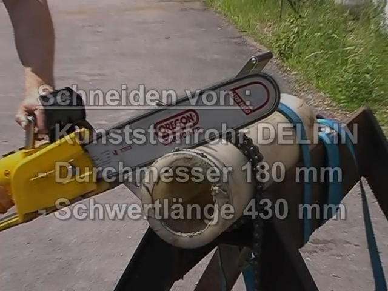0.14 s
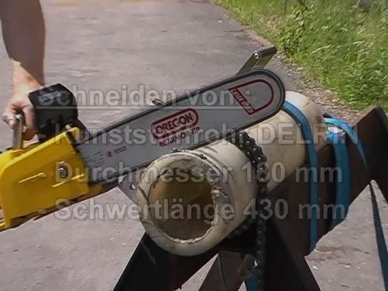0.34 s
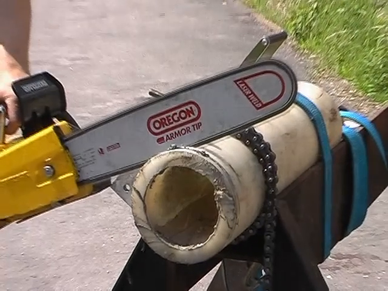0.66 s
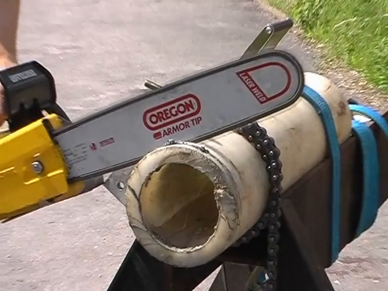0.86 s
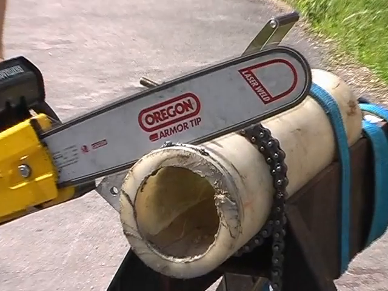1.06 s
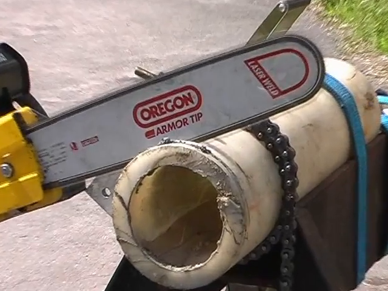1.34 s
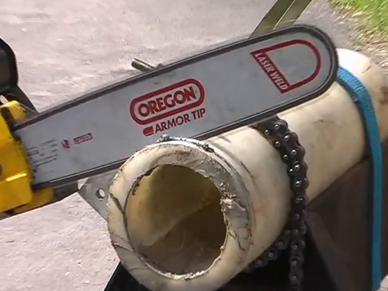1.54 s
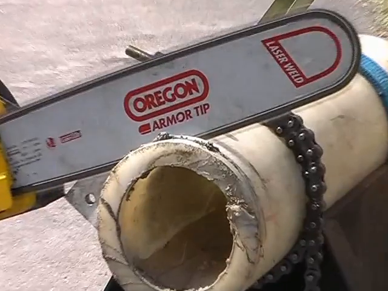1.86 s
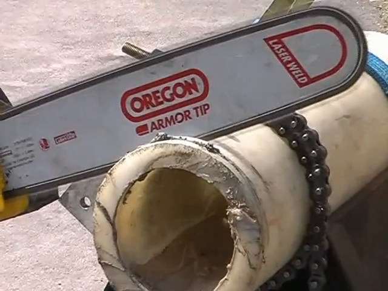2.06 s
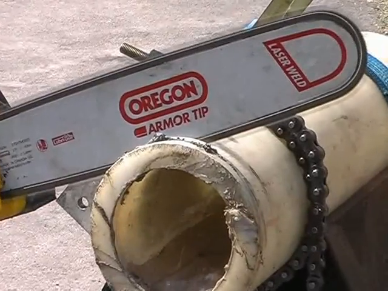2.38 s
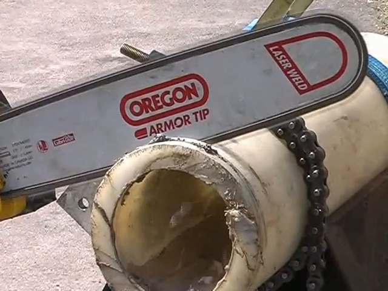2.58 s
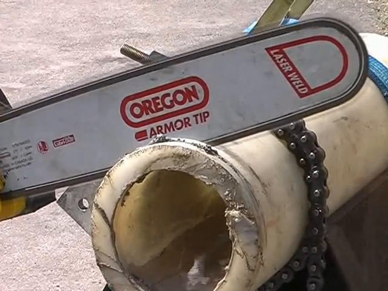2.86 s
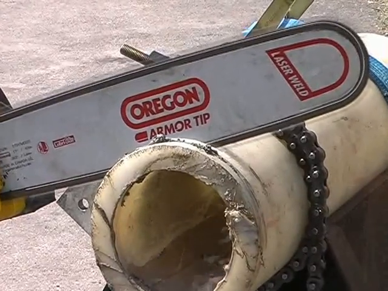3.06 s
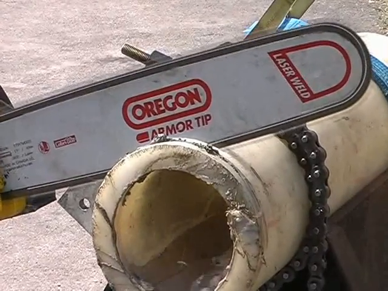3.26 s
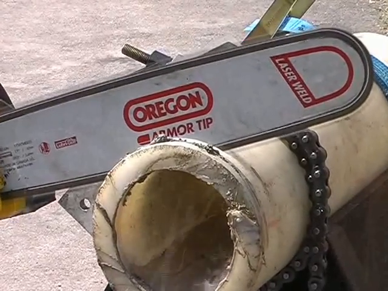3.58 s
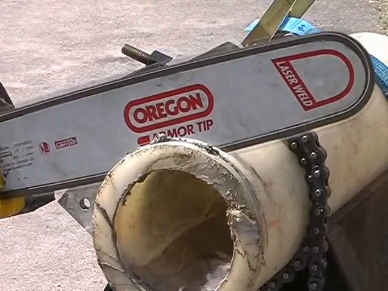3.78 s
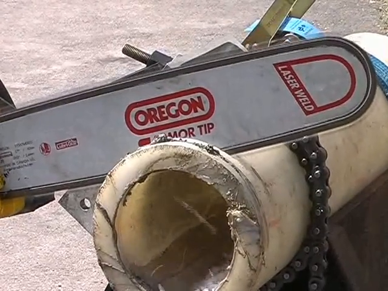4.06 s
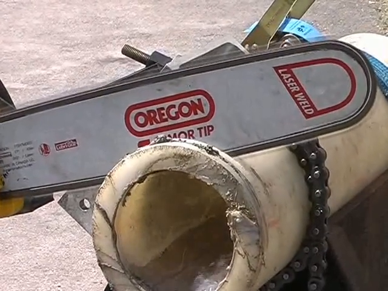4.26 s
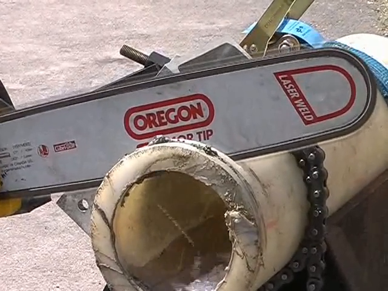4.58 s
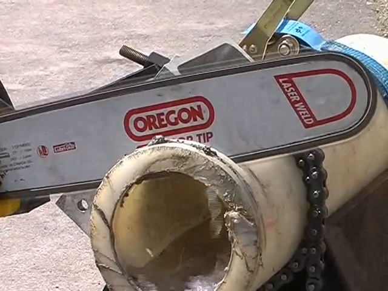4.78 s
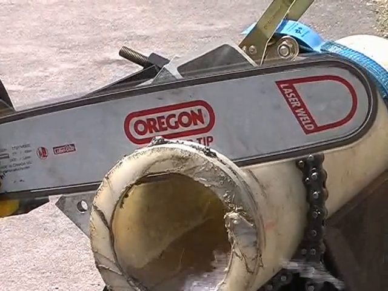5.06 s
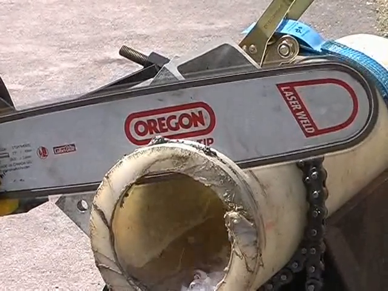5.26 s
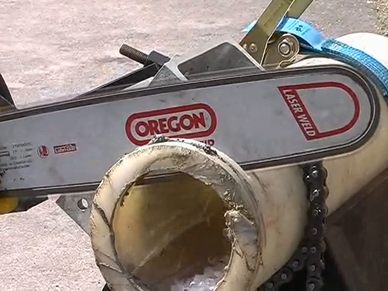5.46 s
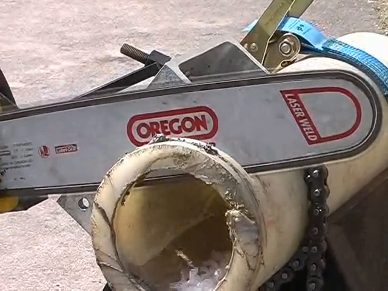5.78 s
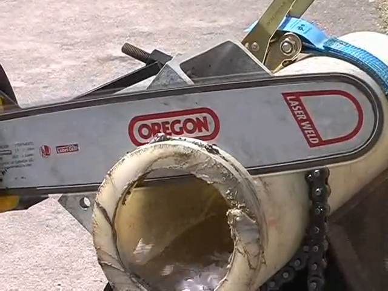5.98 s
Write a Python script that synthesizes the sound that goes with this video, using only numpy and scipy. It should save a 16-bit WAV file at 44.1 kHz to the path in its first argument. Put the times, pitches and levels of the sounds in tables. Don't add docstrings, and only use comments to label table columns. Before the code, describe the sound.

An air-driven chainsaw rushes and whirs steadily outdoors, its chain rasping on the bar as teeth bite and chatter into a hollow plastic pipe.

```python
import sys
import numpy as np
from scipy import signal
from scipy.fft import rfft, irfft, next_fast_len
from scipy.io import wavfile

SR = 44100
rng = np.random.default_rng(int(sys.argv[2]) if len(sys.argv) > 2 else 0)


def linear_from_db(decibels):
    return 10 ** (np.asarray(decibels, float) / 20)


def int16_out(signal):
    q = np.round(np.clip(np.atleast_2d(signal).T, -1, 1) * 32767)
    wavfile.write(sys.argv[1], SR, q.astype(np.int16))


N = 270333

# frequency in Hz, width in Hz, level in dB.
PIPE_MODES = [(653, 29, -2), (719, 49, 5), (794, 57, -4.5)]
# start in seconds, length in seconds, level in dB.
CHATTER_BOUTS = [(1.93, 0.029, -50), (2.013, 0.086, -49), (2.526, 0.029, -51), (2.975, 0.083, -51),
                 (3.209, 0.034, -47), (3.292, 0.032, -46), (3.361, 0.063, -50), (3.526, 0.037, -48),
                 (3.675, 0.056, -46), (3.778, 0.067, -49), (3.88, 0.13, -47), (4.063, 0.079, -48),
                 (4.165, 0.1, -48.5), (4.308, 0.084, -46), (4.437, 0.059, -45), (4.507, 0.092, -46),
                 (4.615, 0.23, -47), (4.882, 0.24, -49), (5.127, 0.14, -44.5), (5.333, 0.094, -43),
                 (5.453, 0.063, -45), (5.591, 0.059, -42), (5.686, 0.14, -45), (5.864, 0.27, -45.5)]


def rms_one(x):
    return x / np.sqrt(np.mean(x ** 2) + 1e-20)


def at_hz(points, hz):
    p = np.array(points, float)
    return np.interp(np.log(hz + 1), np.log(p[:, 0] + 1), p[:, 1])


def filtered(x, response):
    size = next_fast_len(N)
    hz = np.fft.rfftfreq(size, 1 / SR)
    return irfft(rfft(x, size) * response(hz), size)[..., :N]


def drift(rate_hz):
    r = np.exp(-2 * np.pi * rate_hz * 40 / SR)
    noise = rng.standard_normal(N // 40 + 2002)
    slow = signal.lfilter([1], [1, -2 * r, r * r], noise)[2000:]
    return np.interp(np.arange(N) / 40, np.arange(len(slow)), rms_one(slow))


def resonance(x, hz, width_hz):
    r = np.exp(-np.pi * width_hz / SR)
    poles = [1, -2 * r * np.cos(2 * np.pi * hz / SR), r * r]
    return signal.lfilter([(1 - r * r) / 2, 0, (r * r - 1) / 2], poles, x)


def grains(per_s, spread_db):
    sizes = linear_from_db(spread_db * np.minimum(rng.exponential(1, (2, N)), 4))
    signs = rng.choice([-1, 1], (2, N))
    hits = rng.random((2, N)) < per_s / SR
    return rms_one(sizes * signs * hits)


def strikes(events, modes, boost_db):
    clicks = np.zeros((2, N))
    at = [round(s * SR) for s, db in events]
    clicks[:, at] = linear_from_db(np.array(events)[:, 1] + boost_db) * [[1], [.3]]
    clicks = clicks + 1e-18
    return sum(linear_from_db(db) * resonance(clicks, hz, width) * SR / (np.pi * width) for hz, width, db in modes)


def scattered(count, mean_db, spread_db):
    draw = rng.random((count, 2))
    s = (np.sqrt(1 + 3 * draw[:, 0]) - 1) * (N - 1) / SR
    db = mean_db + spread_db * np.sqrt(12) * (draw[:, 1] - .5)
    return list(zip(s, db))


def during(rows, edge_s):
    t = np.arange(N) / SR
    return [np.clip(np.minimum(t - s, s + length - t) / edge_s + .5, 0, 1) for s, length, db in rows]


def rumble():
    # frequency in Hz, level in dB per Hz.
    rumble_colour = [(15, -67), (25, -47), (85, -12.5), (145, -14.5), (183, -6), (348, -4.5), (426, -1.5),
                     (480, -3.5), (588, -2), (620, -3), (810, -25), (1360, -120)]
    noise = rng.standard_normal((2, N))
    return rms_one(filtered(noise, lambda hz: linear_from_db(at_hz(rumble_colour, hz))))


def stand():
    # frequency in Hz, width in Hz, level in dB.
    stand_modes = [(192, 14, -6), (249, 27, -6), (330, 26, -2), (405, 22, -5), (514, 70, 0.5)]
    # start in seconds, length in seconds, level in dB.
    jolts = [
        (1.935, .06, -54),
        (2.049, .1, -55.5),
        (2.218, 0.055, -66),
    ]
    shake = rng.standard_normal((2, N)) * [[1], [.5]]
    body = rms_one(sum(linear_from_db(db) * resonance(shake, hz, width) / np.sqrt(width) for hz, width, db in stand_modes))
    gates = during(jolts, edge_s=0.017)
    shudder = sum(linear_from_db(db) * gate for (s, length, db), gate in zip(jolts, gates))
    blows = [(s + 0.00805, db) for s, length, db in jolts]
    return body * shudder + strikes(blows, stand_modes, boost_db=-2.0)


def chatter():
    turns_per_s, jitter_turns, spread_db = 48, 0.122, 3.0
    out = []
    for s, length, db in CHATTER_BOUTS:
        draw = rng.standard_normal((20, 2))
        after = (np.arange(20) + jitter_turns * draw[:, 0]) / turns_per_s + 0.00401
        keep = (after < length) & (s + after < (N - 1) / SR)
        knock_db = db + 7.0 + spread_db * draw[:, 1]
        out += zip((s + after)[keep], knock_db[keep])
    return out


def pipe(load_db):
    rattle, out = grains(per_s=1500, spread_db=1.5), 0
    for k, (hz, width, db) in enumerate(PIPE_MODES):
        drive = np.roll(rattle, 9001 * k, axis=1) * linear_from_db(db + 1.3 * load_db)
        once = resonance(drive, hz, 1.5 * width)
        out = out + resonance(once, hz, 2.7 * width)
    return rms_one(out)


def bite_swell(bites, rise_s, fall_s, sag, sag_s):
    marks = np.zeros(N)
    marks[[round(s * SR) for s, db in bites]] = [db for s, db in bites]
    t = np.arange(-2000, 3000) / SR - .0012
    swell = np.exp(-.5 * (t / np.where(t < 0, rise_s, fall_s)) ** 2)
    dip = sag * (t > 0) * t / sag_s * np.exp(1 - t / sag_s)
    return signal.fftconvolve(marks, swell - dip)[2000:2000 + N]


def bar_ring():
    # time in seconds, level over rest in dB, length in seconds.
    flares = [(0.58, 9, .05), (1.174, 8, 0.031), (1.64, 6, 0.083), (1.955, 7, 0.036), (2.074, 8.5, .06),
              (2.35, 6, 0.17), (2.612, 15.5, .03), (2.87, 10, .04), (3.104, 10, 0.08), (3.5, 11, 0.098),
              (3.76, 6, .1), (4.018, 10, .05), (4.157, 5, .04), (4.35, 10, 0.021), (4.47, 10, .07),
              (5.3, 8.5, .15), (5.55, 12, 0.089), (5.79, 9, .04), (5.92, 12.5, 0.042), (6.12, 11, 0.078)]
    ring_hz, width_hz, rest_db = 1706, 61 * 1.7, -51
    t = np.arange(N) / SR
    rises = [db * np.maximum(1 - np.abs(t - s) / (1.7 * length), 0) for s, db, length in flares]
    flare_db = np.max(rises, axis=0)
    once = resonance(rng.standard_normal((2, N)), ring_hz, width_hz)
    return rms_one(resonance(once, ring_hz, width_hz)) * linear_from_db(rest_db + flare_db)


def chain(load_db):
    # frequency in Hz, width in Hz.
    bar_modes = [(190, 25), (435, 40), (1010, 110), (1155, 50), (1330, 90), (1465, 60), (1530, 60),
                 (1620, 90), (1950, 160), (2205, 90), (2505, 85), (2645, 45), (2750, 70), (2825, 95),
                 (3230, 85), (3350, 70), (3495, 85), (3830, 110), (4000, 90), (4470, 150), (4650, 140),
                 (5000, 170), (5570, 130), (5850, 160), (6270, 130), (6440, 110), (6900, 260), (9970, 260)]
    # level at the start in dB, change once the bar is buried in dB.
    mode_levels = [(-23, 4), (-17, 6.5), (-9, -0.6), (-13, 8), (-9, 2.9), (-1, -0.5), (-3.5, -4), (-6, 2.3),
                   (-7, 2), (-3.5, 3.5), (2.5, -3.5), (-3.5, 4), (-2.5, 3), (2, -2), (-3.5, 3), (-5, -4.5),
                   (-3, 1), (-12, 1), (-3, 0), (-4.5, 2.5), (-3, -2.5), (-5, -1.5), (-4.5, -2),
                   (-3.5, -0.5), (-9, 7), (-3.5, 0.5), (-5.5, 5), (-4.5, -6.5)]
    rasp, buried, out = grains(per_s=9000, spread_db=2.0), np.linspace(0, 1, N), 0
    for k, ((hz, width), (start_db, change_db)) in enumerate(zip(bar_modes, mode_levels)):
        ring = resonance(np.roll(rasp, 9001 * k, axis=1), hz, width)
        out = out + ring * linear_from_db(start_db + change_db * buried + 0.71 * drift(12))
    return rms_one(out * linear_from_db(0.89 * load_db))


def air(load_db):
    # frequency in Hz, level in dB per Hz.
    jet_colour = [(600, -22), (950, -7.5), (1700, -7), (3000, -4.5), (4200, -8), (5300, -2.5), (6500, -1.4),
                  (7400, -2.5), (8100, -7), (9000, -6.5), (11000, -4.5), (12300, -5.5), (14000, -13.5),
                  (15700, -21.5)]
    size = next_fast_len(N)
    hz, out = np.fft.rfftfreq(size, 1 / SR), 0
    shade_db = -5 / (1 + (hz / 4500) ** 8)
    jet = rfft(grains(per_s=16000, spread_db=2.0), size) * linear_from_db(at_hz(jet_colour, hz) + shade_db)
    for centre_hz in 800 * 2 ** np.arange(0, 5):
        octaves_off = np.clip(np.log2((hz + 1) / centre_hz), -1, 1)
        share = np.cos(np.pi / 2 * octaves_off) ** 2
        out = out + irfft(jet * share, size)[:, :N] * linear_from_db(0.53 * drift(23))
    return rms_one(out * linear_from_db(load_db))


def ports(pair):
    # frequency in Hz, left-right likeness (0-1).
    likeness = [(60, .26), (160, 0.38), (450, 0.8), (800, 0.87), (1500, 0.98), (2100, 0.93), (2800, 0.93),
                (3700, 0.95), (5000, 0.89), (6300, 0.95), (8200, 0.98), (9200, 1), (11500, 0.99),
                (13800, 1)]
    # frequency in Hz, left minus right in dB.
    left_colour = [(60, -2), (300, 0), (2300, -0.3), (2900, -2.5), (3500, -6), (4200, -4.5), (4900, 0.5),
                   (5400, 1), (6800, 0.7), (8100, 0.5), (9000, 0.5), (11600, -1.1), (13200, -3),
                   (14700, -1)]
    # frequency in Hz, lead of the left in radians.
    left_lead = [(0, 0), (3190, -0.19), (3880, 0.17), (5000, 0.53), (6030, -0.01), (7320, 0.38),
                 (8790, 0.41), (11500, -0.015), (13600, 0.62), (15700, -0.1)]

    def alike(hz):
        return np.clip(at_hz(likeness, hz), 0, 1)

    def port(hz):
        return linear_from_db(at_hz(left_colour, hz) / 2) * np.exp(.5j * at_hz(left_lead, hz))

    mid = filtered(pair[0], lambda hz: np.sqrt((1 + alike(hz)) / 2))
    side = filtered(pair[1], lambda hz: np.sqrt((1 - alike(hz)) / 2))
    return np.array([filtered(mid + side, port), filtered(mid - side, lambda hz: 1 / port(hz))])


def scene():
    # time in seconds, swell in dB.
    hard_bites = [(0.97, 1.5), (1.713, 2), (1.945, 2.5), (2.42, 3.5), (2.688, 3.5), (2.932, 2.5),
                  (3.038, 3), (3.217, 2.5), (3.391, 4), (3.515, 2.5), (3.588, 1), (3.637, 3), (3.679, 4.5),
                  (3.716, 2.5), (3.812, 3.5), (3.98, 5), (4.026, 5), (4.209, 4), (4.383, 2.5), (4.404, 1.5),
                  (4.446, 4.5), (4.845, 3.5), (5.136, 3.5), (5.265, 2.5), (5.369, 2.5), (5.477, 4.5),
                  (5.615, 3), (5.72, 4), (5.779, 4.5), (6.002, 4)]
    # time in seconds, level in dB.
    depth = [
        (0.0, -50.5),
        (1.8, -51),
        (3.5, -48.5),
        (4.0, -50),
        (5.3, -47.5),
        (5.7, -47),
        (6.13, -47.5),
    ]
    t = np.arange(N) / SR
    bites = hard_bites + scattered(count=36, mean_db=1.77, spread_db=0.8)
    knocks = chatter() + scattered(count=24, mean_db=-44, spread_db=0.5)
    swell_db = bite_swell(bites, rise_s=0.0028, fall_s=0.00089, sag=0.13, sag_s=0.01)
    load_db = 1.31 * swell_db + 0.62 * drift(23)
    feed_db = 0.18 * drift(8.8)

    rush = linear_from_db(-29.5 + 0.51 + feed_db) * air(load_db)
    rasp = linear_from_db(-34.5 + 1.5 + 0.72 * feed_db) * chain(load_db)

    in_bout = sum(during(CHATTER_BOUTS, edge_s=0.0097))
    boom_db = np.interp(t, *np.transpose(depth)) + 4 * (in_bout - 1)
    knocking = resonance(strikes(knocks, PIPE_MODES, boost_db=-10.0), 743, 185)
    boom = linear_from_db(boom_db) * pipe(load_db) + knocking

    rumble_db = -58 + 2 * (t / t[-1] - .5) + 1.1 * drift(3.0)
    yard = linear_from_db(rumble_db) * rumble() + stand()
    coming_up = linear_from_db(-1 * np.exp(-t / 0.08))
    return ports((rush + rasp + bar_ring() + boom) * coming_up + yard)


def top_cut(x):
    return signal.sosfilt(signal.butter(12, 15800, fs=SR, output="sos"), x)


def record(dry):
    t = np.arange(N) / SR
    settled = dry * linear_from_db(5 * np.exp(-t / 0.45))
    return top_cut(settled)


dry = scene()
out = record(dry)
int16_out(out)
```